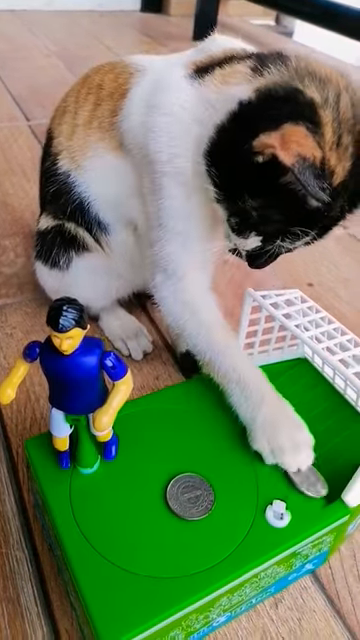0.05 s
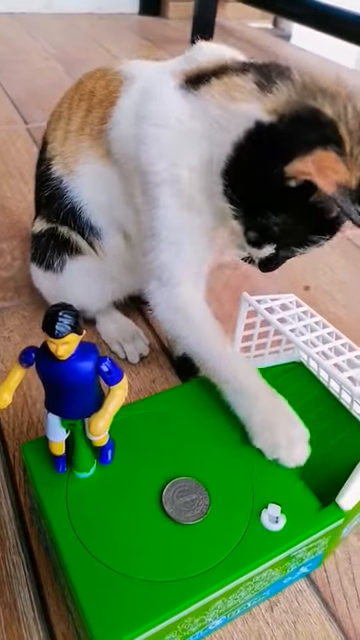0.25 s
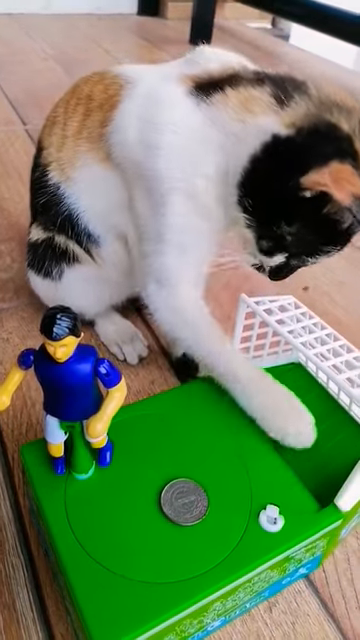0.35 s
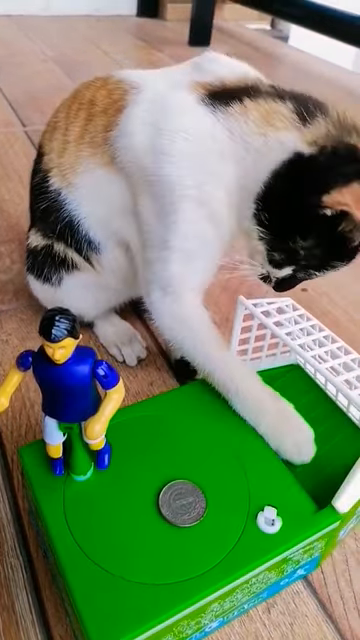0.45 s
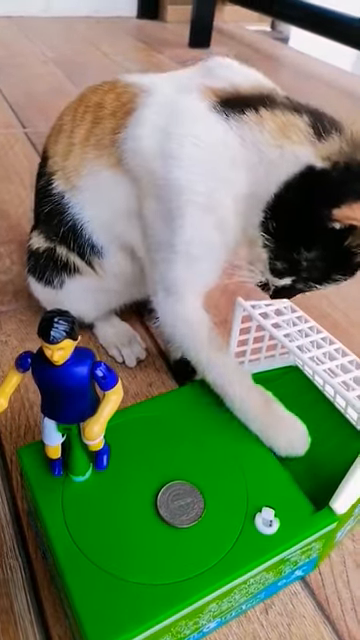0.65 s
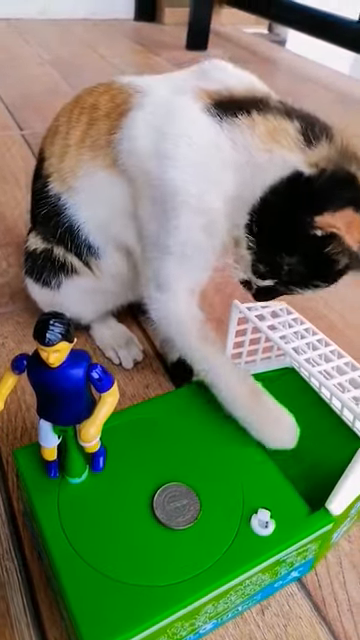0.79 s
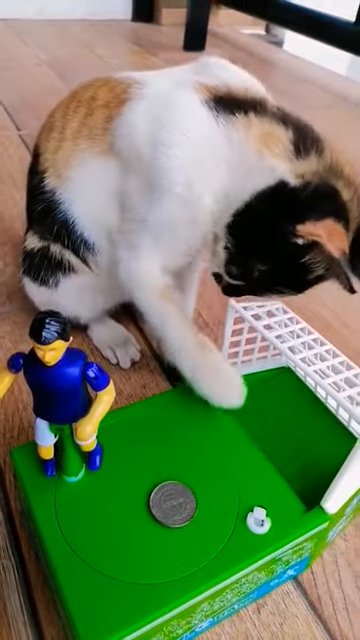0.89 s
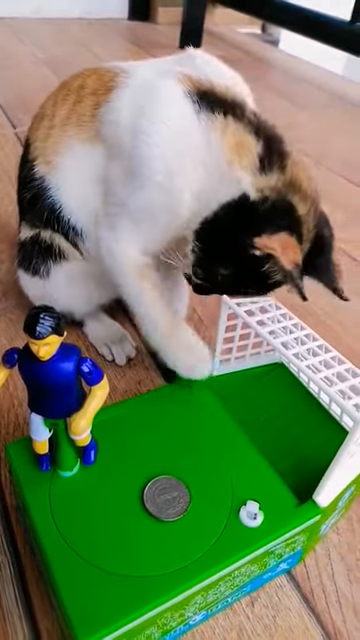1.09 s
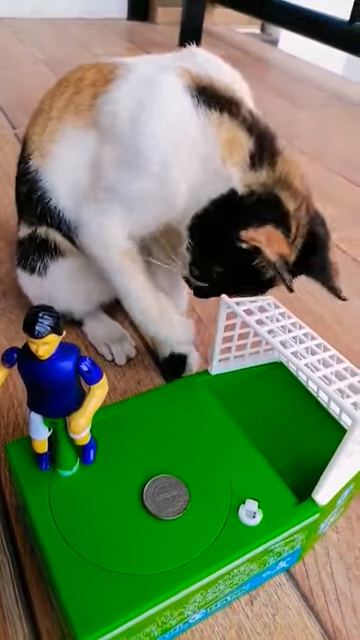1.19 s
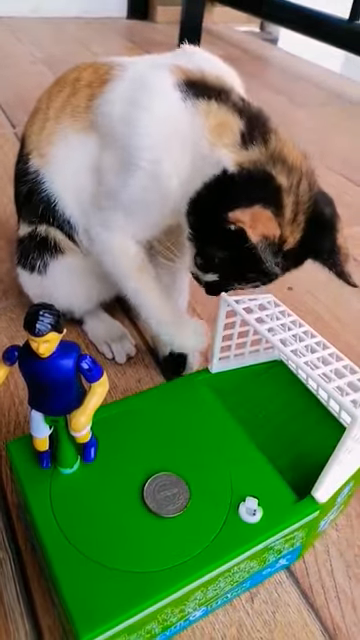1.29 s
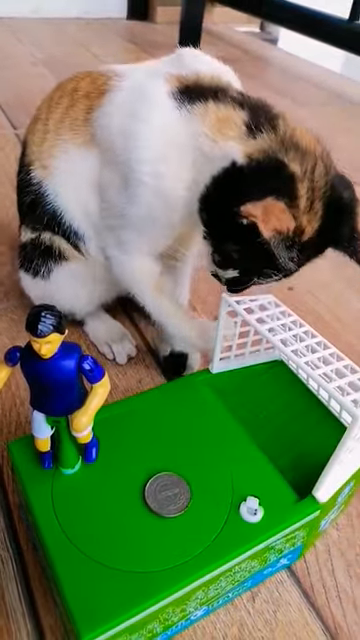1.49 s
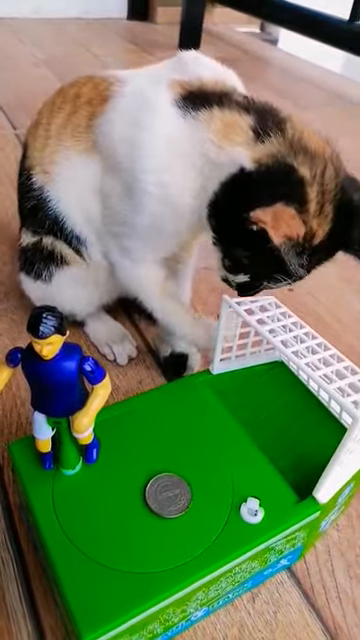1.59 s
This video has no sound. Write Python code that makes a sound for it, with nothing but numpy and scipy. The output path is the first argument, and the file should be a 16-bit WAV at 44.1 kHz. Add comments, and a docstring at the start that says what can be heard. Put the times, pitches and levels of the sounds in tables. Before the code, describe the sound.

A coin ticks lightly and scrapes across a plastic toy bank, tipping into the slot with a sharp crack at about 0.25 seconds. It grinds along the edge, knocks hollowly through the box around 0.4 seconds and lands with a thin ring by 0.5. From 0.7 to 1.4 seconds come faint paw scuffs, with one soft pat and a tiny squeak, over a low room rumble.

```python
"""A cat pushes a coin over a hollow plastic toy bank on a tiled floor, over a low room rumble.
First the coin ticks and scrapes across the plastic. It tips into the slot with a crack and grinds
along the edge. Then it knocks down through the box, making the hollow walls sound, and lands
ringing inside. Last come faint scuffs, probably the paw, with one soft pat and a tiny squeak."""
import sys
import numpy as np
from scipy import signal
from scipy.fft import rfft, irfft, next_fast_len
from scipy.io import wavfile
from scipy.ndimage import uniform_filter1d

SR = 44100
rng = np.random.default_rng(int(sys.argv[2]) if len(sys.argv) > 2 else 0)


def wrap_up_sound(samples):
    """Save the sound to the file named by the first command line argument, as 16-bit audio."""
    columns = np.atleast_2d(samples).T
    # keep every value between -1 and 1, then stretch to whole-number steps
    tamed = np.clip(columns, -1, 1)
    steps = np.round(tamed * 32767).astype(np.int16)
    wavfile.write(sys.argv[1], SR, steps)


N = 72765

# A fade is the time to die away by 60 dB. A colour says how strong a noise is from low to high.
# side_db is left minus right. Levels of colours and ringing notes are relative.
RUMBLE_LEVELS = [(.22, -63.5), (.3, -70.5), (.63, -70.5), (.68, -58.5)]  # the room's rumble: time_s, level_db
RUMBLE_COLOUR = [(45, -1), (170, -6), (380, -20.5), (3000, -41.5)]  # mostly bass: pitch_hz, level_db
ECHO_FADES = [(500, 0.32), (2500, 0.27), (14000, 0.17)]  # the tiled room's echo: pitch_hz, fade_s
STEREO_LIKENESS = [(200, 0.87), (600, 0.57), (1200, 0.083), (2500, 0.035)]  # how alike left and right are: pitch_hz, likeness (1 = the same)

FUR_LEVELS = [(0, -66), (.68, -72.5), (1.04, -61.5), (1.15, -70), (1.39, -65), (1.49, -71.5)]  # fur brushing the toy: time_s, level_db
FUR_COLOUR = [(400, -3.5), (7600, -10.5), (8500, -2.5), (9500, -10), (15000, -20)]  # its soft hiss: pitch_hz, level_db
SCUFFS = [(.728, -59.5, .0024, .14, 960, 3.5), (.815, -55.5, 0.0071, 0.26, 2640, 3),
          (.895, -52.5, 0.0022, .11, 1550, -2.5), (.98, -54, 0.0056, 0.13, 1850, 12),
          (1.06, -55.5, 0.012, .14, 980, 2.5), (1.149, -54, 0.0051, 0.19, 2340, 5.5),
          (1.238, -56.5, 0.0013, 0.098, 556, 10), (1.326, -59, 0.0029, .11, 1070, 8)]  # soft strokes: start_s, level_db, rise_s, fade_s, pitch_hz, boost_db
SCUFF_COLOUR = [(800, 0), (3000, -3.5), (3800, -10.5), (15000, -13)]  # a stroke before its boost: pitch_hz, level_db

TICKS = [(0.011, -48.5), (0.0445, -48.5), (0.0582, -46)]  # light ticks of the coin's rim: start_s, level_db
TICK_COLOUR = [(5400, -10.5), (7700, -5.5), (8400, 10), (9500, -16)]  # their thin, bright sound: pitch_hz, level_db
SLIDE_LEVELS = [(.04, -103, -102), (.072, -58.5, -65), (.13, -54.5, -69.5), (.215, -55, -51),
                (.25, -54, -69)]  # the coin sliding on plastic: time_s, rub_db, hiss_db
RUB_COLOUR = [(400, -31.5), (590, 9), (730, -11.5), (1000, 1.5), (1800, -18.5)]  # the slide's low part: pitch_hz, level_db
HISS_COLOUR = [(7000, 3.5), (8400, 7), (12500, -10), (13650, 5), (14500, -0.5)]  # the slide's high part: pitch_hz, level_db
GRIND_LEVELS = [(.255, -97), (.288, -41.5), (.363, -51.5), (.382, -52), (.4, -120)]  # the coin's edge in the slot: time_s, level_db
GRIND_COLOUR = [(300, -20), (420, 11.5), (1000, 0.5), (3200, -9), (4200, -16), (9000, -7.5), (12000, -40)]  # its rough scrape: pitch_hz, level_db

# Blows that bend a whole wall of the toy: start_s, level_db, pitch_hz, fade_s, side_db
THUMPS = [(.3802, -25.5, 645, 0.058, 9.5), (.5192, -30.5, 672, 0.017, 1), (.899, -49.5, 511, 0.042, -3)]
# The coin's hits: start_s, crack_db, click_db, click_tilt_db_per_octave, side_db, box_db,
# favoured_hz, stretch (multiplies the fades of the shell and the box), coin_db
HITS = [(0.1013, -80, -56.5, -12, -11, -47, 1270, 0.84, -87),
        (.2367, -20.5, -31, 0, -4, -29, 415, 1.05, -72),
        (0.2855, -60, -38.5, -4.5, -3.5, -37.5, 510, 1.3, -64.5),
        (0.3247, -40, -34.5, -1, 0, -51, 520, 0.74, -87), (0.3309, -36, -32, 1.5, 4.5, -36, 540, 0.93, -70),
        (0.3377, -55, -34, -3.5, -4.5, -41, 825, 0.95, -72),
        (.3801, -31, -25, -0.1, .5, -27.5, 678, 0.61, -66),
        (0.4358, -25, -27.5, .5, -1, -69, 520, 0.8, -39), (0.4526, -50, -37.5, 3, -11, -45, 694, 0.88, -54),
        (.4559, -21, -25.5, 0.1, -3, -39.5, 643, 0.67, -40),
        (.4915, -47, -42.5, -0.5, 1.5, -56.5, 553, 1.76, -57),
        (.5015, -45, -41.5, -2.5, -2.5, -50.5, 680, 2.05, -49.5)]
CRACK_COLOUR = [(600, -40), (4400, 0), (5450, 12), (6200, -16), (7200, 13.5), (11000, 2)]  # the rim's first hard contact: pitch_hz, level_db
CLICK_COLOUR = [(150, -19.5), (500, -0.5), (1200, -1.5), (3100, 2.5), (4000, -6.5), (5300, -0.5),
                (9000, 1.5), (11200, -8), (15000, -11.5), (15700, -23)]  # the plastic shell's short, dense ring: pitch_hz, level_db
BOX_PITCHES = [288, 412, 530, 597, 660, 773, 841, 1208, 1572, 1954, 2376]  # the notes the hollow box rings at: pitch_hz
BOX_NOTES = [(-7, 0.085, 0), (-3, 0.14, 6), (-5, 0.1, 1), (-3.5, 0.072, 0), (3.5, 0.082, 4),
             (-1.5, 0.081, 14), (-16, 0.17, -8), (0, 0.052, 18), (-7.5, 0.1, 11), (-15.5, 0.13, 11),
             (-7, 0.092, 23)]  # for each of those notes: level_db, fade_s, side_db
COIN_PITCHES = [11870, 12520, 13440, 13490, 13650, 14420]  # the notes the coin rings at: pitch_hz
COIN_NOTES = [(-3, 0.087), (-14, 0.081), (-7, 0.27), (-9, .18), (-1, 0.14), (-6, 0.1)]  # for each of those notes: level_db, fade_s
SIZZLE_COLOUR = [(11000, -16), (12600, -8), (13150, -15), (13450, 8), (14000, 4), (15000, -3), (15500, -20)]  # the coin's crowded high notes: pitch_hz, level_db

CLICK_RISE_S, CRACK_RISE_S, BOX_RISE_S, THUMP_RISE_S = 0.00062, 0.00014, 0.0011, 0.0016
SHELL_DB, SIZZLE_DB, ECHO_DB = -3.5, -1.5, -15
TOP_HZ = 15900


def amp(db):
    """Turn decibels into a number to multiply by."""
    return 10 ** (np.asarray(db) / 20)


def unit(x):
    """Scale a signal to an average power of 1."""
    return x / np.sqrt(np.mean(x ** 2) + 1e-20)


def at_pitch(table, hz):
    """Read a table between its rows, with pitch counted in octaves."""
    pitches, values = np.transpose(table)
    return np.interp(np.log(hz + 1), np.log(pitches + 1), values)


def curves(table):
    """Give one value per sample for each column after the time."""
    times, *columns = np.transpose(table)
    return [np.interp(np.arange(N) / SR, times, column) for column in columns]


def bump(hz, centre_hz, octaves):
    """A smooth hill of height 1 around one pitch."""
    return np.exp(-.5 * (np.log2((hz + 1) / centre_hz) / octaves) ** 2)


def rise(t, rise_s):
    """Climb from 0 towards 1."""
    return 1 - np.exp(-t / rise_s)


def fade(t, fade_s):
    """Die away by 60 dB every fade_s seconds."""
    return np.exp(-np.log(1000) * t / fade_s)


def pan(side_db):
    """Left and right gains that lie side_db apart."""
    return amp(np.array([[side_db], [-side_db]]) / 2)


def noise(colour, size, boost_db=lambda hz: 0):
    """Stereo noise of power 1 with the given colour, plus a boost that depends on pitch."""
    padded = next_fast_len(size)
    hz = np.fft.rfftfreq(padded, 1 / SR)
    width = np.arccos(np.clip(at_pitch(STEREO_LIKENESS, hz), -.98, .98)) / 2
    gain = amp(at_pitch(colour, hz) + boost_db(hz)) * [np.cos(width), np.sin(width)]
    white = rng.standard_normal((2, padded))
    middle, side = irfft(rfft(white) * gain, padded)[:, :size]
    return unit(np.array([middle + side, middle - side]))


def add(out, start_s, sound):
    """Mix a sound into out, beginning at start_s."""
    i = max(round(start_s * SR), 0)
    out[:, i:i + sound.shape[1]] += sound[:, :N - i]


def ring(t, hz, fade_s, spread, drift=0):
    """One fading note, with left and right out of step by up to spread radians."""
    phase = rng.uniform(0, 2 * np.pi) + spread * rng.uniform(-0.18, 0.78, (2, 1))
    return np.sin(2 * np.pi * hz * t + phase + drift) * fade(t, fade_s)


def rumble():
    """The low background dips around the clatter and comes back a little louder."""
    return amp(curves(RUMBLE_LEVELS)[0]) * noise(RUMBLE_COLOUR, N)


def room_echo(sound, delay_s=0.006):
    """The tiled room adds a short echo whose high notes die first."""
    hz, t, spectrum = signal.stft(rng.standard_normal((2, SR // 2)), SR, nperseg=256)
    fading = spectrum * fade(t, at_pitch(ECHO_FADES, hz)[:, None])
    tail = signal.istft(fading, SR, nperseg=256)[1]
    tail /= np.linalg.norm(tail[0])
    out = np.zeros((2, N))
    add(out, delay_s, signal.fftconvolve(sound, tail, axes=1))
    return out


def paw(squeak_s=1.3295, squeak_hz=1070, squeak_db=-55, squeak_width_s=0.0041):
    """Quick soft scuffs, the last with a tiny squeak, over a faint brushing of fur."""
    out, t = np.zeros((2, N)), np.arange(SR // 2) / SR
    for start_s, level_db, rise_s, fade_s, pitch_hz, boost_db in SCUFFS:
        stroke = np.minimum(t / rise_s, 1) * fade(np.maximum(t - rise_s, 0), fade_s)
        scuff = noise(SCUFF_COLOUR, len(t), lambda hz: boost_db * bump(hz, pitch_hz, octaves=0.52))
        add(out, start_s, amp(level_db) * stroke * scuff)
    from_peak_s = np.arange(N) / SR - squeak_s
    squeak = np.exp(-(from_peak_s / squeak_width_s) ** 2) * np.sin(2 * np.pi * squeak_hz * from_peak_s)
    fur = amp(curves(FUR_LEVELS)[0]) * noise(FUR_COLOUR, N)
    return out + amp(squeak_db) * squeak + fur


def stick_and_slip(depth_db=2.2):
    """The coin catches and lets go, so its level jumps every few milliseconds."""
    jitter = unit(uniform_filter1d(rng.standard_normal(N), size=130))
    return unit(amp(depth_db * jitter))


def slide(end_s=0.26):
    """The coin ticks under the paw, then scrapes towards the slot."""
    ticks, t = np.zeros((2, N)), np.arange(SR // 10) / SR
    tick_shape = rise(t, CLICK_RISE_S) * fade(t, fade_s=0.025)
    for start_s, level_db in TICKS:
        add(ticks, start_s, amp(level_db) * tick_shape * noise(TICK_COLOUR, len(t)))
    rub_db, hiss_db = curves(SLIDE_LEVELS)
    sliding = (np.arange(N) / SR < end_s) * stick_and_slip()
    scrape = amp(rub_db) * noise(RUB_COLOUR, N) + amp(hiss_db) * noise(HISS_COLOUR, N)
    return ticks + sliding * scrape


def grind(lip_hz=1960, lip_db=20.5):
    """The coin's edge chatters along the slot, whose lip rings at one pitch."""
    scrape = noise(GRIND_COLOUR, N, lambda hz: lip_db * bump(hz, lip_hz, octaves=0.031))
    return pan(side_db=7) * amp(curves(GRIND_LEVELS)[0]) * stick_and_slip() * scrape


def thin_bass(sound, below_hz=276):
    """The box is too small to give off much bass."""
    return signal.sosfilt(signal.butter(2, below_hz, "high", fs=SR, output="sos"), sound)


def thumps():
    """The coin's landing, its last tap and a pat of the paw each bend a wall: a short, hollow note."""
    out, t = np.zeros((2, N)), np.arange(SR // 5) / SR
    for start_s, level_db, pitch_hz, fade_s, side_db in THUMPS:
        note = rise(t, THUMP_RISE_S) * fade(t, fade_s) * np.sin(2 * np.pi * pitch_hz * t)
        add(out, start_s, amp(level_db) * pan(side_db) * note)
    return thin_bass(out)


def shell_click(t, tilt_db, favoured_hz, stretch):
    """The coin snaps against the plastic shell, which rings on briefly."""
    shape = fade(t, fade_s=0.0078) + amp(SHELL_DB) * fade(t, fade_s=0.1 * stretch)
    click = noise(CLICK_COLOUR, len(t), lambda hz: tilt_db * np.log2(hz + favoured_hz))
    return rise(t, CLICK_RISE_S) * shape * click


def box_ring(t, favoured_hz, stretch, favour_db=8):
    """The hollow box rings; each spot that is hit brings out the notes near its favoured pitch."""
    notes = 0
    for hz, (level_db, fade_s, side_db) in zip(BOX_PITCHES, BOX_NOTES):
        cut_db = favour_db * (1.5 - bump(hz, favoured_hz, octaves=0.33))
        notes += amp(level_db - cut_db) * pan(side_db) * ring(t, hz, stretch * fade_s, spread=0.73)
    return rise(t, BOX_RISE_S) * notes


def coin_ring(t, blur_hz=45):
    """The tumbling coin rings with high, wavering notes and a sizzle of many more."""
    notes = 0
    for hz, (level_db, fade_s) in zip(COIN_PITCHES, COIN_NOTES):
        waver = np.cumsum(rng.standard_normal(len(t))) * np.sqrt(2 * np.pi * blur_hz / SR)
        notes += amp(level_db) * ring(t, hz, fade_s, spread=4.4, drift=waver)
    sizzle = amp(SIZZLE_DB) * noise(SIZZLE_COLOUR, len(t)) * fade(t, fade_s=0.17)
    return rise(t, CLICK_RISE_S) * (notes + sizzle)


def clatter():
    """Each hit cracks, clicks and rings the box and coin; a coin that stays touching damps the box."""
    out, t = np.zeros((2, N)), np.arange(SR // 2) / SR
    crack_shape = rise(t, CRACK_RISE_S) * fade(t, fade_s=0.0039)
    for start_s, crack_db, click_db, tilt_db, side_db, box_db, favoured_hz, stretch, coin_db in HITS:
        crack = amp(crack_db) * crack_shape * noise(CRACK_COLOUR, len(t))
        click = amp(click_db) * shell_click(t, tilt_db, favoured_hz, stretch)
        box = amp(box_db) * box_ring(t, favoured_hz, stretch)
        coin = amp(coin_db) * coin_ring(t)
        add(out, start_s, pan(side_db) * (crack + click + box + coin))
    return thin_bass(out)


def scene():
    """The coin and the paw, with their echo and the room's rumble."""
    near = clatter() + thumps() + slide() + paw() + grind()
    return near + amp(ECHO_DB) * room_echo(near) + rumble()


def record(dry):
    """Cut away everything above TOP_HZ."""
    padded = next_fast_len(N + SR // 2)
    kept = np.fft.rfftfreq(padded, 1 / SR) < TOP_HZ
    return irfft(rfft(dry, padded) * kept, padded)[:, :N]


dry = scene()
out = record(dry)
wrap_up_sound(out)
```